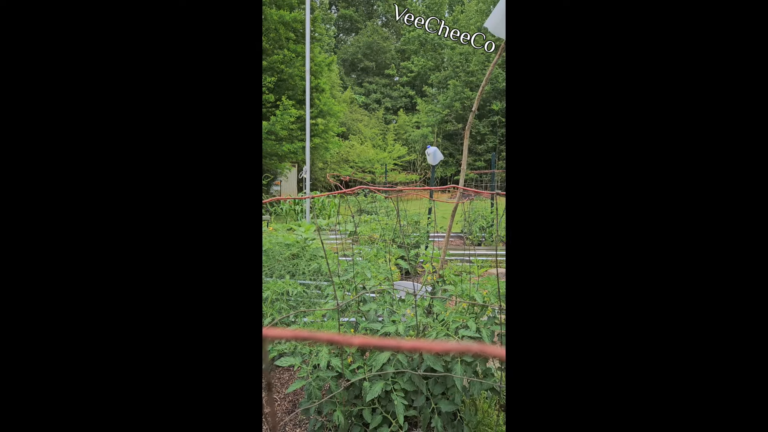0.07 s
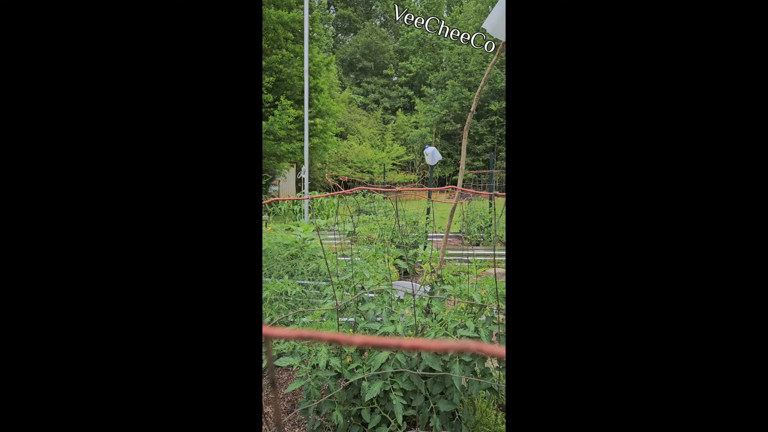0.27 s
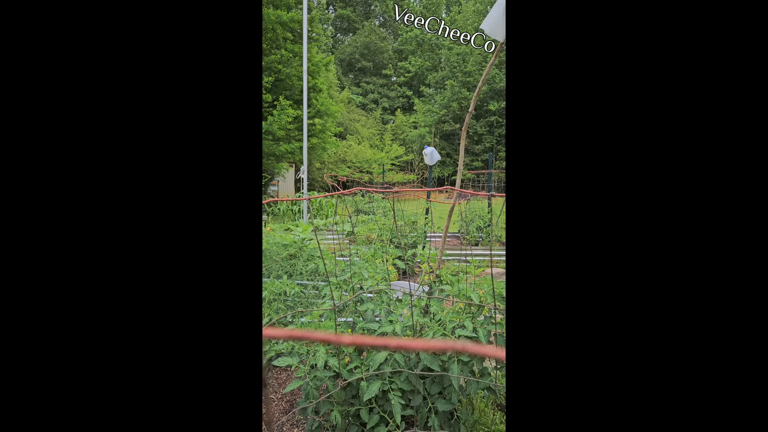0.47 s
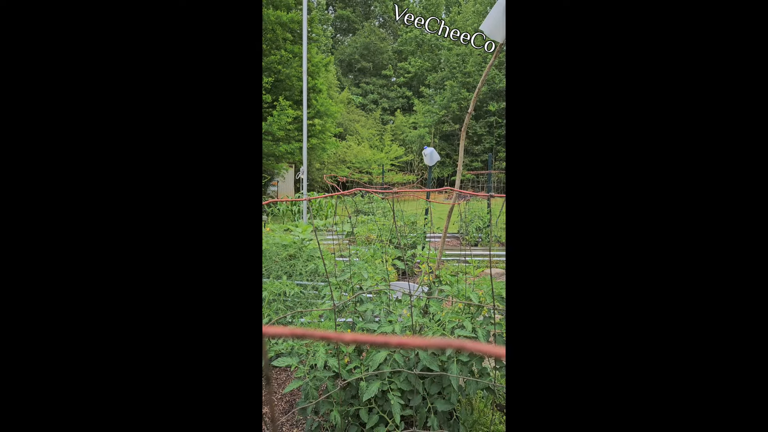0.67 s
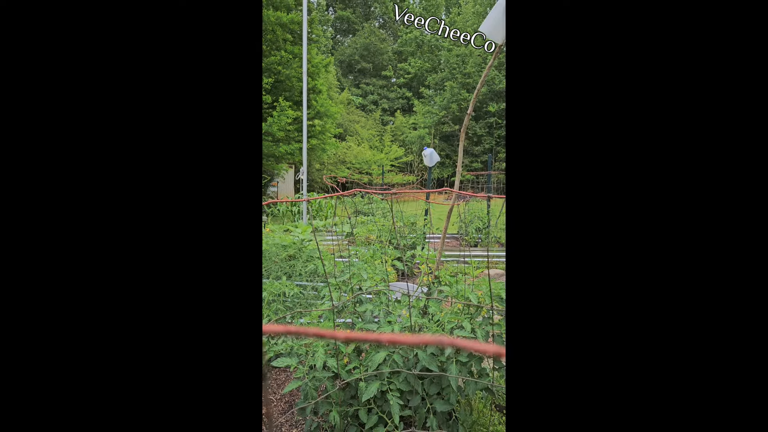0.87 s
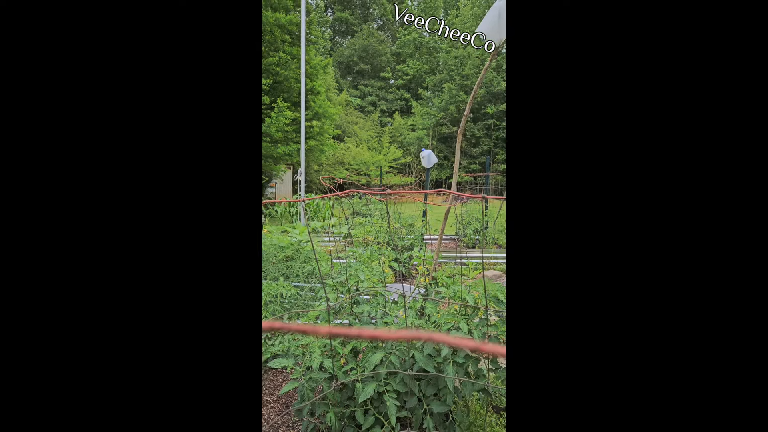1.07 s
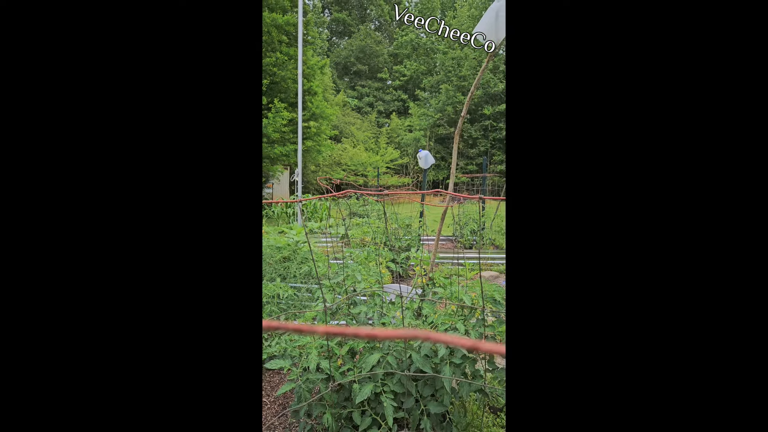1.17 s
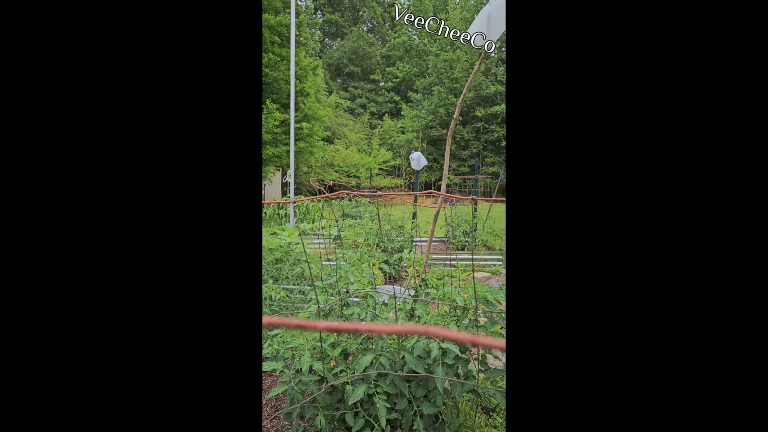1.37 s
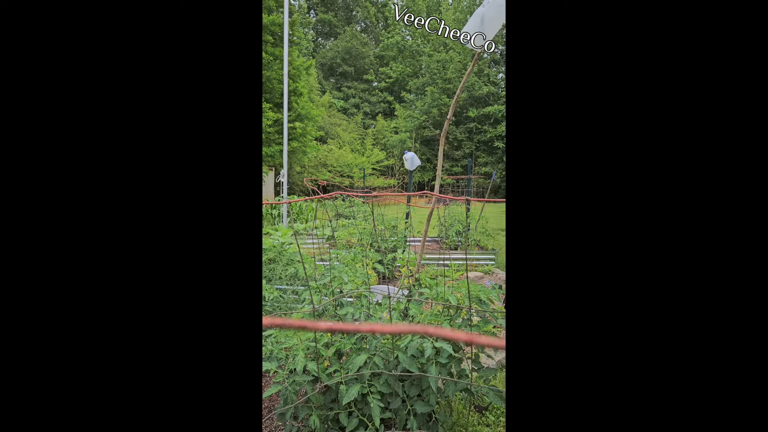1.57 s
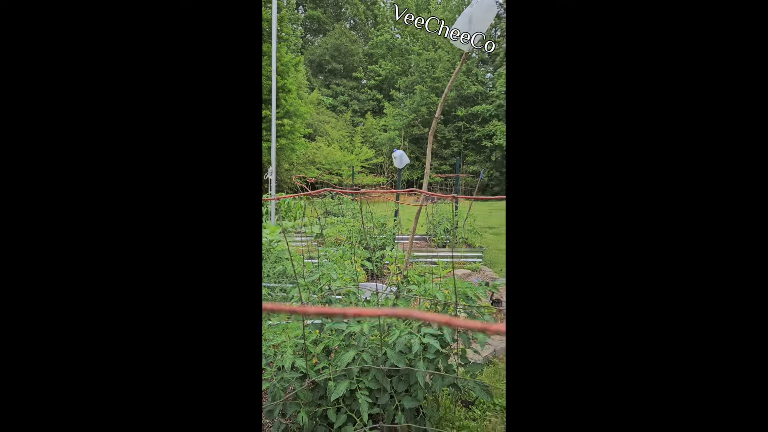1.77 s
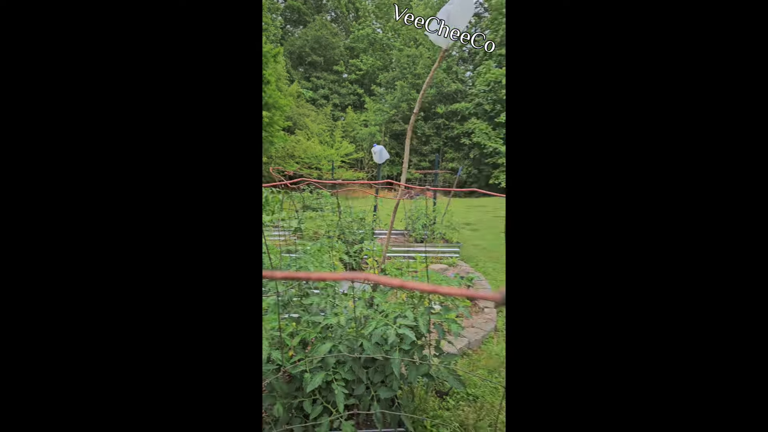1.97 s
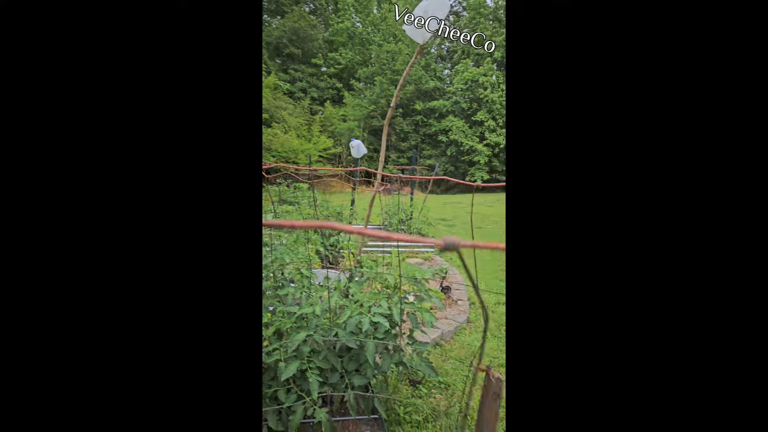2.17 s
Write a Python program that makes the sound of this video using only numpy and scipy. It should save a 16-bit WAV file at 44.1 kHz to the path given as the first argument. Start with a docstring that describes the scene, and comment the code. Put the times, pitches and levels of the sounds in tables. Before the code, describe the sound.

Impact lawn sprinkler starts fast, even ticking and spraying in a garden with faint birds.

```python
"""A quiet garden with an impact sprinkler on the right. Birds whistle and chip over a low rumble of air;
the head trips its stop lever with a knock, and the arm starts slapping the jet about nine times a second.
Each impact excites the damped modes of the metal head and scatters off nearby surfaces. The turbulent
spray hisses in time with the arm, and its drops patter on the beds and spatter on leaves."""
import sys
import numpy as np
from scipy import signal
from scipy.fft import rfft, irfft
from scipy.io import wavfile
from scipy.ndimage import uniform_filter1d

SR = 44100
rng = np.random.default_rng(int(sys.argv[2]) if len(sys.argv) > 2 else 0)


def int16_out(signal):
    """Quantize to a 16-bit WAV file."""
    q = np.round(np.clip(np.atleast_2d(signal).T, -1, 1) * 32767)
    wavfile.write(sys.argv[1], SR, q.astype(np.int16))


N = 97813
T = np.arange(N) / SR

# Impacts of the arm on the jet: start_s, slap_db, ring_db, clack_db, clack_hz
SLAPS = [(0.8762, -5, -2.5, 0, 2796), (0.9815, -5.5, -1, -4, 2770), (1.0878, -4, 0, -4, 2820),
         (1.1939, -3.5, -2, 3, 2796), (1.3003, -3.5, -1.5, -2, 2680), (1.4068, -1, 0, -1, 2640),
         (1.5131, 0.5, 0.5, -4, 2620), (1.6195, 1.5, 1.5, -4, 2640), (1.7256, 1.5, 1, -2, 2630),
         (1.8326, 1.5, 0.5, 0, 2520), (1.9391, 0, 1, 1, 2330), (2.0453, 0, 0.5, 1.5, 2393),
         (2.1525, -1.5, 1, 5, 2510)]
# Modes of the metal head: pitch_hz, level_db, t60_s, left_minus_right_db
HEAD_MODES = [(474.3, -46, 0.063, 1), (872, -41.5, 0.03, -8), (1321, -38.5, 0.03, 0), (1557, -48, 0.02, -1),
              (2043, -54, 0.044, -6.5), (2390, -46, 0.039, -13), (2847, -45, 0.055, -6),
              (3440, -42.5, 0.053, -4.5), (4764, -38.5, 0.052, -1), (5400, -42, 0.04, -3),
              (8300, -44, 0.035, 2), (8930, -46, 0.035, -1), (11720, -45, 0.03, -4)]
# Modes of the stop lever: pitch_hz, level_db, t60_s
LEVER_MODES = [(470, -53, .04), (850, -33, .022), (1090, -36, .018), (1350, -34, .025), (1570, -36, .024),
               (2450, -45, .03)]
# Spectral envelopes of the noisy sources: frequency_hz, left_db, right_db
SLAP_SPECTRUM = [(202, -56, -60), (890, -49, -31), (1800, -33.5, -36.5), (1910, -25.5, -34.5),
                 (2690, -33, -16), (3080, -29, -25), (3270, -24.5, -26), (4100, -40, -32), (4500, -34, -31),
                 (6200, -31, -32.5), (6840, -23, -18), (8740, -23.5, -18.5), (9340, -29, -31),
                 (10860, -55, -36), (11690, -28, -9.5), (13300, -31, -22.5), (14700, -56, -20.5),
                 (16300, -45, -46)]
SCATTER_SPECTRUM = [(150, -42.5, -41.5), (358, -43.5, -48), (700, -37, -33.5), (1320, -34, -32),
                    (2770, -44.5, -25), (4130, -37, -34.5), (4580, -35, -25), (5900, -38.5, -34.5),
                    (8900, -30.5, -24.5), (9760, -36, -38), (12400, -36, -26), (15100, -55, -54)]
KNOCK_SPECTRUM = [(151, -52, -50), (490, -40, -40), (860, -31, -31), (1420, -29, -25), (2020, -36, -31.5),
                  (3120, -30.5, -36), (4660, -44, -31.5), (6000, -38.5, -44), (8060, -46, -35),
                  (9700, -49, -41), (12100, -42, -25), (15450, -49, -33)]
SPRAY_SPECTRUM = [(195, -49, -46.5), (437, -47, -51), (630, -53.5, -50.5), (1320, -48, -45),
                  (2980, -49.5, -45.5), (4940, -53, -46.5), (6250, -49.5, -48.5), (8560, -47, -39),
                  (10220, -52, -51.5), (12200, -50, -36.5), (16100, -54, -48.5)]
AIR_SPECTRUM = [(24.1, -50, -61), (54.4, -44.5, -41), (110, -37, -39), (166, -53, -46.5), (330, -61.5, -55),
                (714, -61.5, -61), (1440, -60.5, -59), (4000, -66.5, -60), (9050, -61.5, -64.5),
                (9750, -80, -79), (11900, -75, -66), (15000, -78, -72)]
# Amplitude envelopes of the jet, water on beds, water on leaves and air: time_s, level_db
JET_LEVEL = [(.72, -44), (.762, -14), (.777, 0), (.795, -8.5), (.835, -10), (.92, 0.5), (1.25, -2),
             (1.7, -0.5), (1.9, 0.5), (2.02, 2), (2.12, 2.5), (2.18, 5.5), (2.22, -6.5)]
PATTER_LEVEL = [(.75, -79), (1, -89), (1.3, -65), (1.7, -70), (2.2, -63)]
SPATTER_LEVEL = [(1.85, -90.5), (1.96, -59), (2.02, -53), (2.08, -54), (2.18, -56.5), (2.22, -59)]
AIR_LEVEL = [(0, 3.5), (.15, 1), (.35, -1.5), (.7, -1.5), (1.1, 4.5), (2.2, -1.5)]
# Modulation of the spray over one swing of the arm: phase_cycles, gain_db
SWING_GAIN = [(0, 5.5), (.26, 2.5), (.4, -0.5), (.6, -1), (.8, -0.9), (1, 2.5)]
# Bright swells of the swinging jet: peak_s, level_db, rise_s, fall_s
SWISHES = [(0.776, -41, 0.005, 0.005), (2.166, -35, 0.035, 0.023)]
# Slurred bird notes: start_s, length_s, first_hz, second_hz, slur_after_s, level_db, change_db, scoop_ratio
WHISTLES = [(0.178, 0.215, 2195, 1765, .103, -63.5, -4, 0), (0.411, .265, 3015, 2485, .108, -63.5, 1, 0.33)]
# Thin calls of a second bird: start_s, level_db
CHIPS = [(0.022, -53.5), (0.497, -54)]

NOISE_LAG_S, RING_LAG_S = 0.00013, 0.00019  # the sprinkler's sound reaches the left side later


def arm_slaps():
    """Impact noise: the arm strikes the jet; nearby surfaces reflect and scatter the blow."""
    lead_in_s, echo_s = 0.0024, 0.0083
    force = amp([row[1] for row in SLAPS])
    slap = splashes(force, lag_s=0.0002, hold_s=0.0013, fall_s=0.0005)
    scatter = [splashes(np.sqrt(force), lag_s=0.0012054, hold_s=0.0035, fall_s=0.0083) for _ in range(2)]
    scatter = amp(26) * diffuse(scatter, shared_hz=780)
    # a faint, bright hiss swells just before each slap
    swell = sum(amp(db / 2) * np.exp(-abs(T - s) / lead_in_s) * (T < s) for s, db, *_ in SLAPS)
    lead_in_hiss = amp(-1.5) * swell * np.diff(rng.standard_normal(N + 1)) / 2
    strike = amp(22) * (slap + amp(-12.5) * delay(slap, echo_s)) + lead_in_hiss
    return colour(from_right(strike), SLAP_SPECTRUM) + colour(scatter, SCATTER_SPECTRUM)


def splashes(gains, lag_s, hold_s, fall_s, crossover_hz=5000):
    """Jet break-up: the body of each slap repeats, while above the crossover the water breaks anew."""
    body = burst(lag_s, hold_s, fall_s)
    same = sum(gain * delay(body, row[0]) for gain, row in zip(gains, SLAPS))
    fresh = sum(gain * burst(row[0] + lag_s, hold_s, fall_s) for gain, row in zip(gains, SLAPS))
    ratio = np.fft.rfftfreq(N, 1 / SR) / crossover_hz
    return irfft((rfft(same) + ratio * rfft(fresh)) / np.hypot(1, ratio), N)


def head_ring():
    """Modal vibration: each slap rings the head, whose upper modes fade as it turns away."""
    onset_lag_s, turn_db_per_s, turn_hz = 0.0006, -8.5, 4500
    taps, clacks = np.zeros((2, N))
    for start, _, ring_db, clack_db, clack_hz in SLAPS:
        taps[int((start + onset_lag_s) * SR)] = amp(ring_db)
        clacks += delay(mode(clack_hz, clack_db - 33.5, t60=0.042), start + onset_lag_s)
    metal = from_right(clacks) * pan(-2.5)
    for hz, db, t60, pan_db in HEAD_MODES:
        ring = signal.fftconvolve(taps, mode(hz, db, t60))[:N]
        directivity = amp(turn_db_per_s * (T - SLAPS[0][0]) * min(hz / turn_hz, 1) ** 2)
        metal += from_right(ring * directivity, RING_LAG_S) * pan(pan_db)
    return metal


def stop_lever():
    """Impact and rebound: the lever snaps, rings in its damped modes and strikes again softly."""
    knock_s, rebound_s, tail_s = 0.7343, 0.765, 0.02
    tail = np.array([amp(-2.5) * burst(knock_s, 0.005, tail_s)
                     + amp(-12.5) * burst(rebound_s, 0.0029, tail_s) for _ in range(2)])
    ring = sum(mode(*row) for row in LEVER_MODES)
    strikes = delay(ring, knock_s) + amp(-18) * delay(ring, rebound_s)
    snap = from_right(burst(knock_s, hold_s=0.001, fall_s=0.002))
    return from_right(strikes, RING_LAG_S) * pan(-2.5) + amp(23) * colour(snap + tail, KNOCK_SPECTRUM)


def spray():
    """Turbulence and shot noise: the jet hisses and sheds ticking drops, modulated by the swinging arm."""
    drops_per_s, drop_spread_db, surge_db = 630, 4.2, 1.57
    arrivals = rng.random((2, N)) < drops_per_s / SR
    sizes = amp(drop_spread_db * np.minimum(rng.exponential(size=(2, N)), 4))
    drops = arrivals * sizes * rng.choice([-1, 1], (2, N))
    hiss = amp(-3.5) * rng.standard_normal((2, N)) * amp(2.2 * wander(200))
    water = diffuse(hiss + amp(-8.5) * unit(drops), shared_hz=676)
    swing_phase = np.interp(T, [row[0] for row in SLAPS], np.arange(len(SLAPS))) % 1
    swing_db = np.interp(swing_phase, *np.array(SWING_GAIN).T)
    flow = curve(JET_LEVEL) * amp(swing_db + surge_db * wander(71))
    return colour(water * flow, SPRAY_SPECTRUM)


def swishes():
    """High-passed noise: the treble of the spray swells briefly as the jet swings."""
    highpass = signal.butter(2, 6160, "high", fs=SR, output="sos")
    mist = signal.sosfilt(highpass, rng.standard_normal((2, N)))
    envelope = sum(amp(db) * np.exp(-np.maximum((peak - T) / rise, (T - peak) / fall))
                   for peak, db, rise, fall in SWISHES)
    return unit(colour(mist, SPRAY_SPECTRUM)) * envelope


def leaf_spatter():
    """Random impacts: drops on foliage merge into an uneven, bright band of noise."""
    leaves = np.array([band_noise(3330, octaves=0.43) * amp(2.5 * wander(300)) for _ in range(2)])
    return leaves * curve(SPATTER_LEVEL) * pan(-4.5)


def bed_patter():
    """Random impacts: drops on the beds merge into a low, fluctuating band of noise."""
    return band_noise(372, octaves=0.36) * amp(3.3 * wander(55)) * curve(PATTER_LEVEL)


def whistles():
    """Frequency glide: each wavering pure tone slurs down to a second pitch, dipping in level on the way."""
    slur_s, scoop_s, ramp_s = 0.0108, 0.012, 0.042
    song = np.zeros(N)
    for start, length, first_hz, second_hz, slur_after, db, change_db, scoop in WHISTLES:
        age = T - start
        glide = 1 - np.exp(-np.maximum(age - slur_after, 0) / slur_s)
        hz = (first_hz + (second_hz - first_hz) * glide) * (1 + 0.0042 * wander(57))
        hz *= 1 - scoop * np.exp(-(age / scoop_s) ** 2)
        envelope = np.clip(np.minimum(age, length - age) / ramp_s, 0, 1)
        dip_db = -5.5 * np.exp(-((age - slur_after) / slur_s - 0.5) ** 2)
        song += amp(db + change_db * glide + dip_db + 1.5 * wander(60)) * envelope * tone(hz)
    return song


def chips():
    """Frequency modulation: fast random jitter roughens a high, quickly fading tone."""
    pitch_hz, rasp_hz, rise_s, fall_s = 8020, 1120, 0.012, 0.067
    song = np.zeros(N)
    for start, db in CHIPS:
        age = np.maximum(T - start, 0)
        envelope = np.minimum(age / rise_s, 1) * np.exp(-age / fall_s)
        song += amp(db) * envelope * tone(pitch_hz * (1 + 0.027 * wander(rasp_hz)))
    return song


def birds(fall_s=0.1):
    """Reverberation: scattering among the trees gives both birds' calls an exponential tail."""
    song = whistles() + chips()
    trees = rng.standard_normal((2, N)) * np.exp(-T / fall_s)
    echo = signal.fftconvolve(song[None], trees / np.linalg.norm(trees[0]), axes=1)[:, :N]
    return (song + amp(-3) * echo) * pan(-5)


def air():
    """Ambient noise: a distant rumble, alike on both sides, lies under a faint wide hiss."""
    return colour(diffuse(rng.standard_normal((2, N)), shared_hz=680), AIR_SPECTRUM) * curve(AIR_LEVEL)


def mode(hz, db, t60):
    """Damped oscillation: a struck partial falls 60 dB in t60 seconds."""
    return amp(db) * np.cos(2 * np.pi * hz * T) * np.exp(-np.log(1000) * T / t60)


def tone(hz):
    """A sinusoid whose phase is the integral of its frequency."""
    return np.sin(2 * np.pi * np.cumsum(hz) / SR)


def burst(start_s, hold_s, fall_s, size=4096):
    """Broadband transient: a dense crackle of unit energy holds, then decays."""
    envelope = np.exp(-np.maximum(T[:size] - hold_s, 0) / fall_s)
    x = rng.standard_normal(size) * envelope
    for _ in range(4):  # flatten the spectrum, then restore the decay
        spectrum = rfft(x)
        x = irfft(spectrum / (abs(spectrum) + 1e-12)) * np.sqrt(envelope)
    return np.pad(x / np.linalg.norm(x), (int(start_s * SR), N))[:N]


def band_noise(hz, octaves):
    """Noise of unit rms in a Gaussian band on a logarithmic frequency axis."""
    offset = np.log2((np.fft.rfftfreq(N, 1 / SR) + 1) / hz)
    return unit(irfft(rfft(rng.standard_normal(N)) * np.exp(-(offset / octaves) ** 2 / 2), N))


def wander(hz):
    """Low-passed random motion of unit rms."""
    size = int(SR / hz)
    return unit(uniform_filter1d(uniform_filter1d(rng.standard_normal(N), size), size))


def colour(x, rows, size=4096):
    """Spectral shaping: left and right filters share the minimum phase of their mean log gain."""
    hz, *sides = np.array(rows, float).T
    log_hz = np.log(np.maximum(np.fft.rfftfreq(size, 1 / SR), 1))
    gains = amp([np.interp(log_hz, np.log(hz), side) for side in sides])
    cepstrum = irfft(np.log(gains).mean(0))
    phase = 2 * rfft(cepstrum[:size // 2], size).imag
    response = np.roll(irfft(gains * np.exp(1j * phase)), size // 2, axis=1)
    return signal.fftconvolve(np.atleast_2d(x), response, axes=1)[:, size // 2:size // 2 + N]


def diffuse(pair, shared_hz):
    """Diffuse field: two independent signals become coherent at long wavelengths."""
    coherence = 0.96 / (1 + (np.fft.rfftfreq(N, 1 / SR) / shared_hz) ** 4)
    mid, side = rfft(pair) * np.sqrt([(1 + coherence) / 2, (1 - coherence) / 2])
    return irfft([mid + side, mid - side], N)


def from_right(x, lag_s=NOISE_LAG_S):
    """Time difference of arrival: the left side lags the right."""
    return np.array([delay(x, lag_s), x])


def pan(db):
    """Stereo gains for a level difference, left minus right."""
    return amp([[db / 2], [-db / 2]])


def delay(x, seconds):
    """Time shift by whole samples."""
    return np.pad(x, (int(round(seconds * SR)), 0))[:N]


def curve(rows):
    """Gain envelope through (time_s, level_db) points."""
    return amp(np.interp(T, *np.array(rows).T))


def amp(db):
    """Decibels to amplitude ratio."""
    return 10 ** (np.asarray(db) / 20)


def unit(x):
    """Normalisation to unit rms."""
    return x / np.sqrt(np.mean(x ** 2))


def scene():
    """Superposition of sprinkler, falling water, birds and garden air."""
    sprinkler = arm_slaps() + head_ring() + stop_lever() + spray()
    return sprinkler + bed_patter() + swishes() + leaf_spatter() + birds() + air()


def record(dry):
    """Band limiting: a steep low-pass removes the treble above 16 kHz."""
    return signal.sosfilt(signal.ellip(8, 0.2, 70, 16000, fs=SR, output="sos"), dry)


dry = scene()
out = record(dry)
int16_out(out)
```